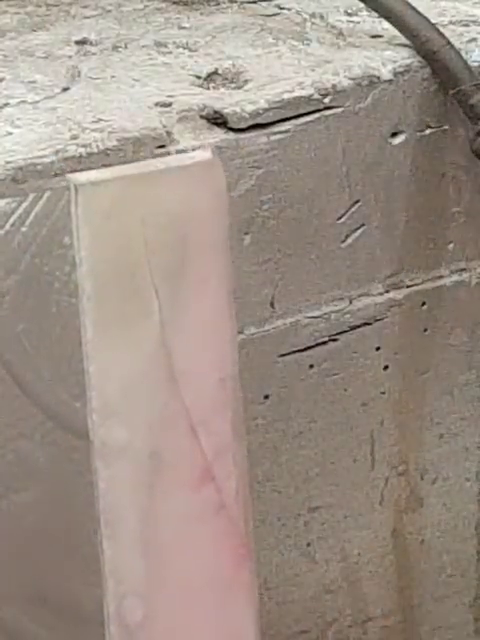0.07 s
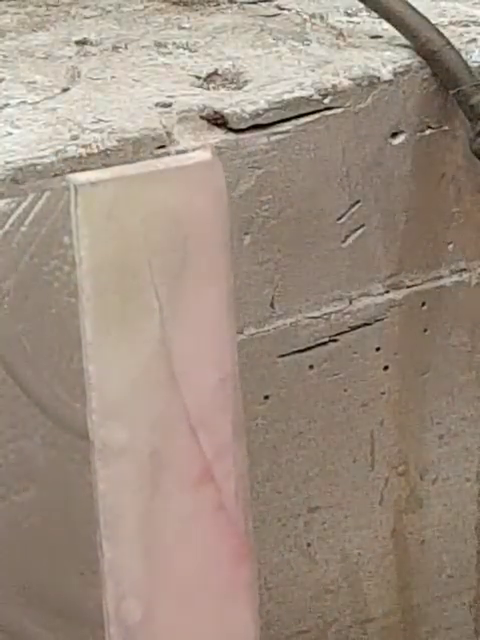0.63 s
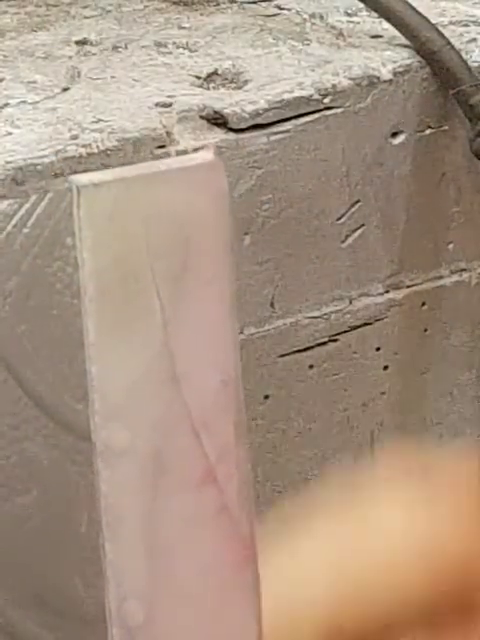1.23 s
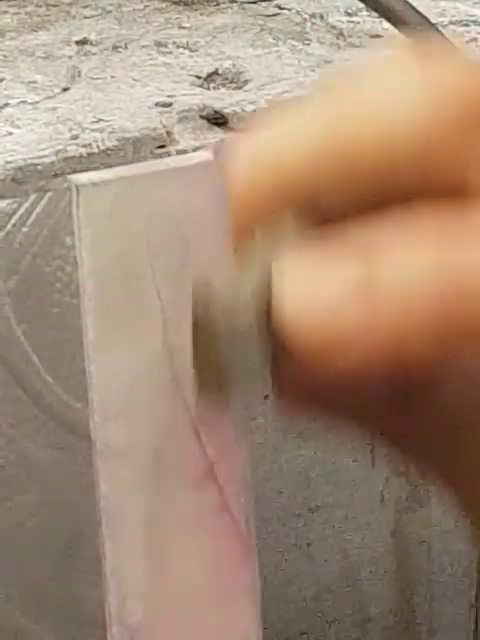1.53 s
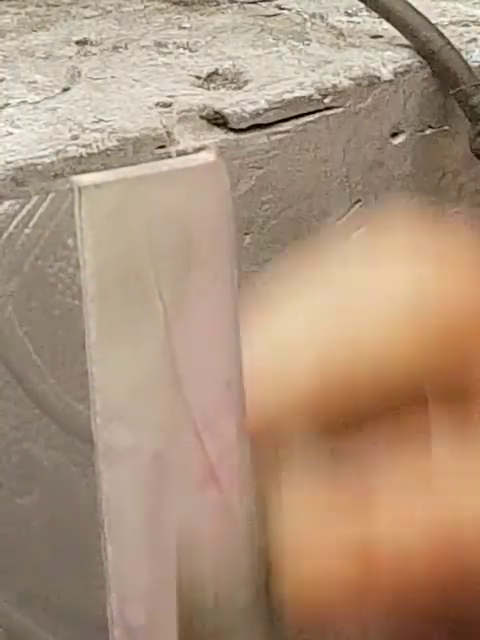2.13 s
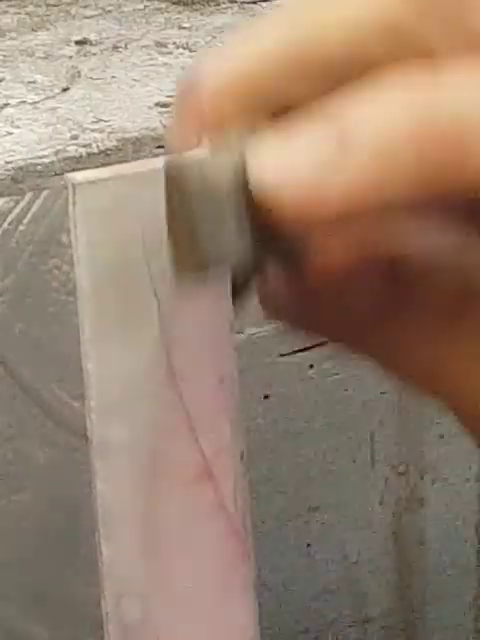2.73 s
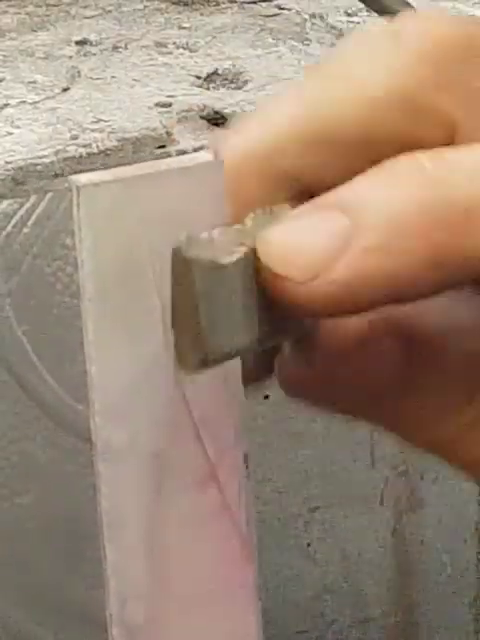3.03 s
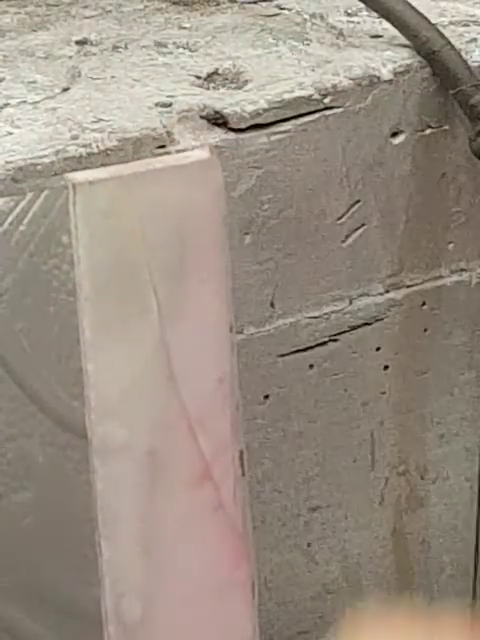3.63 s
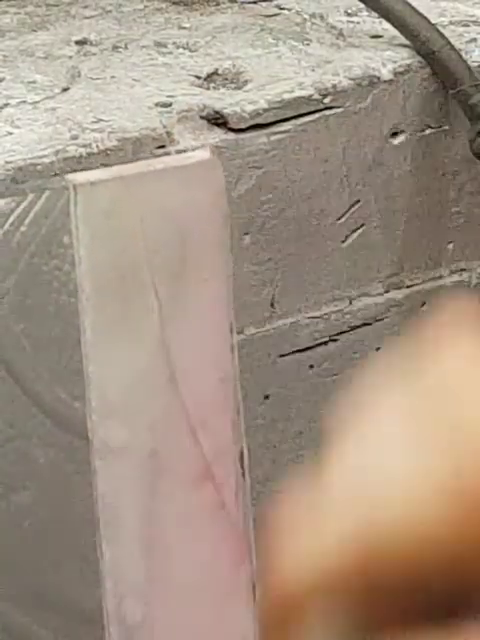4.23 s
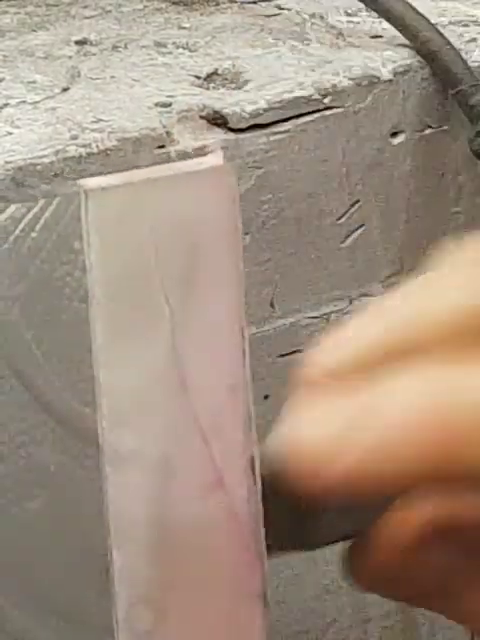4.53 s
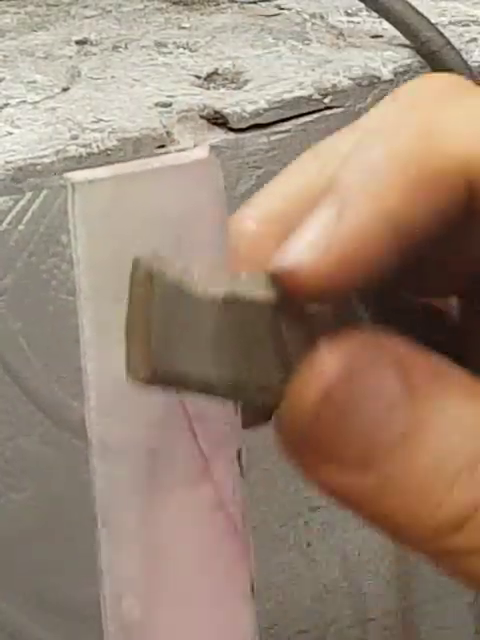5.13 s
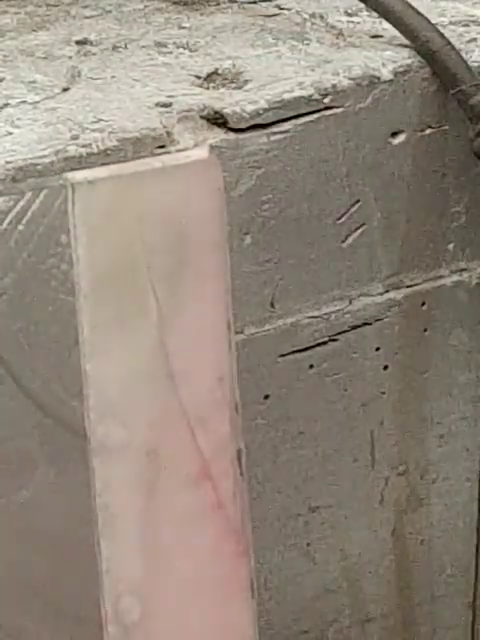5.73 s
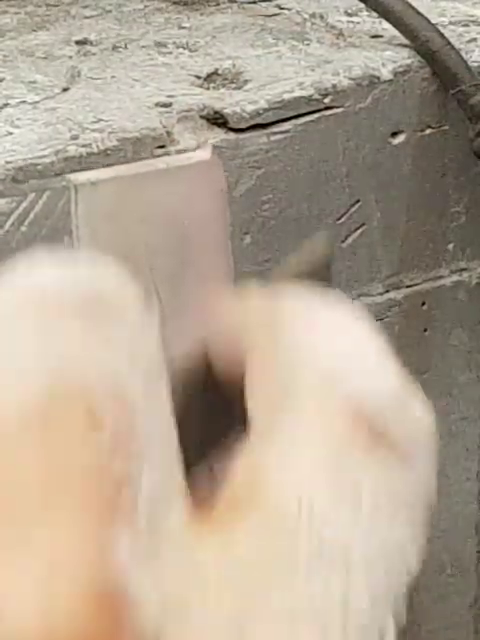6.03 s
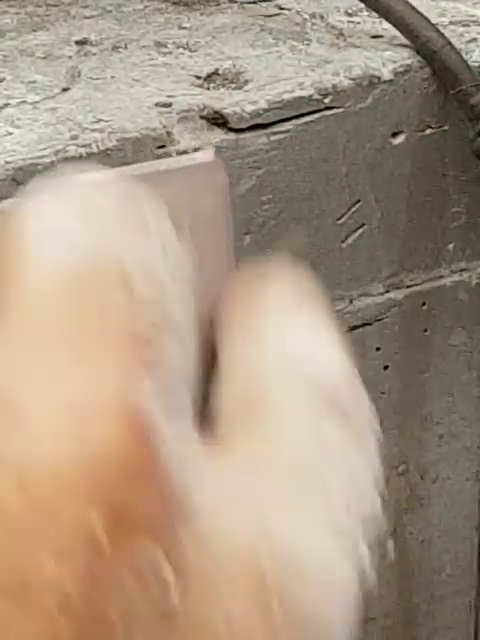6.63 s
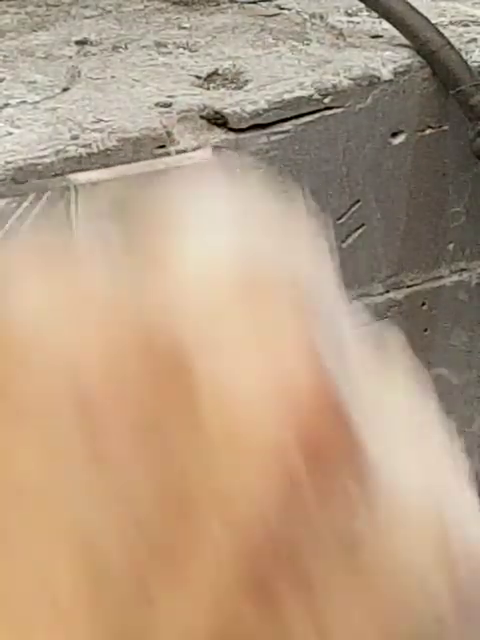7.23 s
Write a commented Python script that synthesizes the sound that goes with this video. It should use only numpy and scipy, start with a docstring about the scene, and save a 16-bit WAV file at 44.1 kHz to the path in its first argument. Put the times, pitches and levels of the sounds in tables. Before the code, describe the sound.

A small sharpening stone scrapes quickly back and forth along a glass edge, stops with a few sharp knocks, then resumes.

```python
"""A small sharpening stone rubbed back and forth along the edge of a glass pane, in a hard-walled workshop.
Its grit scratches the pane's modes into sound; the stone slips off, knocks back on, slides lightly,
and the strokes resume. A nearby stereo microphone picks up the pane, the near walls and the room's
short tail, over quiet background air."""
import sys
import numpy as np
from scipy import signal
from scipy.fft import rfft, irfft, next_fast_len
from scipy.io import wavfile
from scipy.ndimage import uniform_filter1d, map_coordinates

SR = 44100
rng = np.random.default_rng(int(sys.argv[2]) if len(sys.argv) > 2 else 0)


def pcm_store(signal):
    """Save signal as 16-bit PCM."""
    levels = np.round(np.clip(np.atleast_2d(signal), -1, 1) * 32767)
    wavfile.write(sys.argv[1], SR, levels.astype(np.int16).T)


N = 320599

FFT_SIZE = 8192
HZ = np.fft.rfftfreq(FFT_SIZE, 1 / SR)
# Broad response of stone on glass. Each row: frequency in Hz, gain in dB.
GLASS_RESPONSE = [(60, -37.5), (100, -26), (130, -28), (290, -27), (350, -15.5), (620, -17), (780, -8),
                  (1000, -2), (2000, -6), (2900, -0.5), (4200, -3.5), (5300, -12.5), (6200, -7.5),
                  (9000, -23), (11500, -18), (15500, -24)]


def amp(db):
    """Decibels to gain."""
    return 10 ** (np.asarray(db) / 20)


def unit(x):
    """Scaled to rms 1."""
    return x / np.sqrt(np.mean(x ** 2) + 1e-20)


def along(points, hz):
    """(Hz, value) points read on a log frequency axis."""
    point_hz, values = np.transpose(points)
    return np.interp(np.log(hz + 1), np.log(point_hz + 1), values)


def wobble(position):
    """A smooth random curve with one knot per unit of position."""
    return map_coordinates(rng.standard_normal(int(position[-1]) + 4), [position])


def filtered(x, response):
    """Filter x by a gain given as a function of Hz."""
    n = x.shape[-1]
    padded = next_fast_len(n + FFT_SIZE)
    return irfft(rfft(x, padded) * response(np.fft.rfftfreq(padded, 1 / SR)), padded)[..., :n]


def minimum_phase(db):
    """Impulse response of energy 1, shaped by a dB curve on the HZ grid."""
    cepstrum = irfft(np.log(amp(db)))
    cepstrum[1:FFT_SIZE // 2] *= 2
    cepstrum[FFT_SIZE // 2 + 1:] = 0
    impulse = irfft(np.exp(rfft(cepstrum)))
    return impulse / np.linalg.norm(impulse)


def add(track, start_s, x):
    """Mix x into the track from start_s."""
    i = round(start_s * SR)
    x = x[:, max(-i, 0):N - i]
    track[:, max(i, 0):][:, :x.shape[1]] += x


def diffuse(pair, alike=0.99, crossing_s=0.00044):
    """Sound from all sides: alike at both capsules in the bass, unrelated in the treble."""
    angle = lambda hz: np.arccos(np.clip(alike * np.sinc(2 * hz * crossing_s), -1, 1)) / 2
    mid, side = filtered(pair, lambda hz: np.array([np.cos(angle(hz)), np.sin(angle(hz))]))
    return np.array([mid + side, mid - side])


def workshop_air(level_db=-59.5, drift_db=1.0):
    """Room tone: the quiet, nearly steady air all around the microphone."""
    # Spectrum of the air. Each row: frequency in Hz, relative density in dB.
    spectrum = [(15, -51), (25, -17.5), (43, -20.5), (55, -9.5), (76, -9), (123, -12.5), (371, -18),
                (473, -17), (527, -18.5), (1040, -21), (1550, -23.5), (3050, -29.5), (4100, -36),
                (8970, -44.5), (15800, -38)]
    t = np.arange(N) / SR
    noise = diffuse(rng.standard_normal((2, N)), alike=0.62)
    air = filtered(noise, lambda hz: amp(along(spectrum, hz)))
    return unit(air) * amp(level_db + drift_db * wobble(6 * t))


def in_workshop(x, direct_db=-9.5, walls_db=-8, tail_db=-3, walls_t60=0.067, lag_s=.00034):
    """The direct sound reaches the left capsule a little late; near walls and the room's tail follow."""
    # Decay of the room. Each row: frequency in Hz, t60 in seconds.
    decay = [(150, 0.88), (500, 0.37), (2500, 0.25), (7000, 0.21), (15000, 0.14)]
    hz, frame_s, spectra = signal.stft(rng.standard_normal((2, SR // 2)), SR, nperseg=256)
    tail = signal.istft(spectra * amp(-60 * frame_s / along(decay, hz)[:, None]), SR, nperseg=256)[1]
    t = np.arange(tail.shape[1]) / SR
    walls = rng.standard_normal(tail.shape) * amp(-60 * t / walls_t60)
    echo = (amp(tail_db) * unit(tail) + amp(walls_db) * unit(walls)) / np.sqrt(len(t))
    wet = signal.fftconvolve(x[None], diffuse(echo), axes=1)[:, :len(x)]
    return wet + amp(direct_db) * np.array([np.roll(x, round(lag_s * SR)), x])


def ringing_modes(rise_s=0.0043):
    """Single lightly damped modes, left ringing by a bump or as the stone lifts, swell and die away."""
    # Each row: start in seconds, level in dB, frequency in Hz, t60 in seconds.
    rings = [(0.913, -47, 147, 0.72), (1.522, -45, 173, 0.37), (1.922, -38, 161, 0.37),
             (2.201, -39, 158.5, .35), (3.918, -40, 159.6, 0.4), (4.472, -46, 760, 0.99),
             (5.01, -39.5, 156, 0.31), (5.22, -40, 562, 0.64), (7.035, -43.5, 99.3, 0.88)]
    out, t = np.zeros((2, N)), np.arange(SR) / SR
    for start, db, hz, t60 in rings:
        envelope = amp(db - 60 * t / t60) * (1 - np.exp(-t / rise_s))
        add(out, start, (envelope * np.sin(2 * np.pi * hz * t))[None])
    return out


def pane(force, comb_db, bass_db, body_db, hiss_db):
    """The pane's answer to a force: its modes on a broad response, tilted by how the stone is held."""
    # Resonances. Each row: frequency in Hz, width in Hz, strength in dB against the broad response.
    resonances = [(182.5, 13, 10.5), (249.7, 29, 8.5), (370, 53, 12), (419, 6.1, 10), (530, 60, 7),
                  (577.4, 24.5, 13), (698, 45, 8), (846.7, 11, 6.5), (910, 6, 1.5), (962, 8.8, 1.5),
                  (1004, 35, -9), (1038, 16, 2.5), (1236, 170, -1.5), (1530, 15, 3), (1667, 99, 8),
                  (1840, 36, -6), (1857, 60, 6.5), (2235, 54, 2), (2375, 20, 6.5), (2507, 110, -0.5),
                  (2577, 22, -10.5), (2872, 100, 0.5), (3035, 16, -7.5), (3210, 90, 1), (3395, 86, -2),
                  (3450, 22, -11), (4130, 86, -2), (7380, 32, 6)]
    hz, width, db = np.transpose(resonances)[:, :, None]
    peaks = amp(db) ** 2 / (1 + (2 * (HZ - hz) / width) ** 2)
    modes = 10 * np.log10(1 + peaks.sum(axis=0))
    # higher up the modes crowd into an irregular comb
    comb = comb_db * along([(1000, .15), (3300, .25), (4800, 1)], HZ)
    tilt = along([(130, 0), (300, bass_db), (430, bass_db), (650, body_db), (1200, body_db),
                  (1800, 0), (4200, 0), (6000, hiss_db)], HZ)
    impulse = minimum_phase(along(GLASS_RESPONSE, HZ) + modes + comb + tilt)
    return signal.fftconvolve(np.pad(force, (0, SR // 3)), impulse)


def stone_knocks(comb_db, crack_t60=.012, contact_hz=10500):
    """The stone catches or lands on many grains at once: a sharp crack, then a quickly dying crunch."""
    # Each row: start in seconds, force in dB, crunch t60 in seconds, extra bass, body and hiss in dB.
    knocks = [(.719, -16, .12, -11, -11, -10.5), (3.045, -17, .1, -10, -10, -8.5),
              (4.4719, -6, 0.032, 0.5, -6, -3), (4.559, -16.5, 0.044, -4, -0.5, -4.5),
              (5.0054, -8, 0.041, 8.5, -2.5, -0.5), (5.015, -8.5, .08, 3, -0.5, -6.5),
              (6.058, -26.5, 0.07, 11, -4, -11.5), (6.204, -17, 0.11, 7.5, -2.5, -8.5)]
    out, t = np.zeros((2, N)), np.arange(SR // 10) / SR
    blunt_corner = signal.butter(2, contact_hz, fs=SR)  # softens the top
    for start, db, crunch_t60, *colour_db in knocks:
        crack = amp(-60 * t / crack_t60)
        crunch = .8 * amp(-60 * t / crunch_t60)
        force = amp(db) * np.maximum(crack, crunch) * rng.standard_normal(len(t))
        force[0] = 4 * amp(db)  # first contact
        force = signal.lfilter(*blunt_corner, force)
        add(out, start, in_workshop(pane(force, comb_db, *colour_db)))
    return out


def grit(t, rough_db=2.0, chips_per_s=70):
    """Countless grains scratch in clumps; now and then a larger one breaks off."""
    grains = rng.standard_normal(len(t))
    clumps = amp(rough_db * wobble(t * 500) + 0.55 * wobble(t * 55))
    chips = (rng.random(len(t)) < chips_per_s / SR) * rng.uniform(-9, 9, len(t))
    return unit(grains * clumps) + chips


def patches(shape, bins):
    """A random frequency-by-time field, smoothed over the given bins and six frames."""
    return unit(uniform_filter1d(uniform_filter1d(rng.standard_normal(shape), bins, 0), 6, 1))


def cross_nodes(force, start, outward, fine_db=1.5, broad_db=0.43):
    """The stone crosses nodes and antinodes of the bending waves, so the colour shifts within a stroke."""
    # The standing wave under the stone.
    # Each row: time in seconds, antinode in Hz at one turn and at the other, depth in dB.
    standing_wave = [(0, 2045, 3620, 4.5), (1.5, 2100, 3550, 2.5), (2.4, 2190, 3200, 1),
                     (5.302, 2470, 3170, 0.5), (6.2, 1940, 2296, 4), (7.27, 1880, 2280, 1)]
    times, *columns = np.transpose(standing_wave)
    near_hz, far_hz, depth_db = [np.interp(start, times, column) for column in columns]
    hz, t, spectra = signal.stft(force, SR, nperseg=1024)
    place = (1 - outward * np.cos(np.pi * t / t[-1])) / 2
    antinode_hz = near_hz + (far_hz - near_hz) * place
    # a bending wave's wavenumber grows with the root of frequency
    standing = np.cos(4 * np.pi * np.sqrt(hz[:, None] / antinode_hz))
    reach = along([(700, 0.17), (1900, 1), (3300, 0.14), (6000, 0.14)], hz)[:, None]
    fine = np.minimum(patches(spectra.shape, bins=2), 1.3)  # sharp dips, but only blunt peaks
    broad = patches(spectra.shape, bins=14)
    colour_db = depth_db * reach * standing + fine_db * fine + broad_db * broad
    # the modes share the rubbing's power, so the colour leaves the level alone
    power = np.average(amp(colour_db) ** 2, axis=0, weights=amp(along(GLASS_RESPONSE, hz)) ** 2)
    colour_db -= 10 * np.log10(power)
    return signal.istft(spectra * amp(colour_db), nperseg=1024)[1][:len(force)]


def stone_strokes(comb_db, level_db=-.5, turn_speed=0.046, light_db=-21.5):
    """The stone speeds up and slows to each turn; in most strokes the hand bears down, then eases off."""
    # Strokes, each lasting until the next turn or lift.
    # Each row: start in seconds, relative pressure at mid-stroke in dB, its fall over the stroke in dB.
    strokes = [(-0.11, -16.5, 21.5), (0.111, -17.5, 4), (0.364, -20.5, 5.0), (0.582, -21, 6.5),
               (0.824, -20, 5.5), (0.988, -17, 4.5), (1.26, -20, 6.0), (1.425, -17.0, 6.5),
               (1.647, -18, -4.5), (1.814, -17, 4.0), (2.008, -19.5, -11.5), (2.153, -19, 19),
               (2.342, -22.0, 10), (2.455, -21.5, 20.5), (2.61, -25, 2.5), (2.734, -23.5, 24),
               (2.866, -21, 4.5), (2.979, -22, 7.5), (3.118, -18.1, 2.0), (3.349, -18, 13.5),
               (3.584, -17, 11), (3.78, -17.5, 10), (4.034, -16.5, 0.5), (4.236, -14.5, -3.5),
               (5.071, -32, 27), (6.044, -33, 2.0), (6.186, -17.5, 19), (6.352, -18.0, 14),
               (6.498, -20.5, 26), (6.636, -21.5, 23.5), (6.762, -16.5, 15.0), (6.892, -18.5, 20.5),
               (7.029, -18.6, 20.5), (7.159, -19, 16)]
    # Times in seconds at which the stone stops rubbing.
    lifts = [4.455, 5.341, 6.175, 7.295]
    # The grip shifts along the edge. Each row: time in seconds, extra bass, body and hiss in dB.
    grip_tone = [(.22, -6.5, -1.5, 1), (.71, -5.5, -6, 1.5), (.92, -0.5, -6.5, -0.5), (1.12, -8, -2.5, .5),
                 (1.35, -2.5, -2.5, 1), (2.1, -1.5, 0.5, .5), (2.55, -2, -4.5, -1.5), (3.04, 0, -5.5, -1.5),
                 (3.25, -1, 0.5, 1.5), (3.9, -1, -3.5, 0.5), (4.15, 0, -3, 2.5), (4.35, -0.5, 0, -0.5),
                 (6.27, -0.5, -2, -5), (6.6, -2, -2.5, -1.5), (7.252, -4.5, -4, -1.7)]
    out = np.zeros((2, N))
    stops = np.append([row[0] for row in strokes], lifts)
    grip_s, *grip_db = np.transpose(grip_tone)
    for k, (start, press_db, ease_db) in enumerate(strokes):
        end = stops[stops > start].min()
        t = np.arange(round((end - start) * SR)) / SR
        progress = t / t[-1]
        speed = turn_speed + (1 - turn_speed) * np.sin(np.pi * progress)
        pressure = amp(level_db + press_db - ease_db * (progress - .5))
        force = pressure * speed * cross_nodes(grit(t), start, outward=(-1) ** k)
        bass_db, body_db, hiss_db = [np.interp((start + end) / 2, grip_s, band) for band in grip_db]
        # below light_db the stone skates instead of biting, and the tone gains bass and body
        skate_db = max(light_db - press_db, 0)
        scrape = pane(force, comb_db, bass_db + 0.75 * skate_db, body_db + 0.45 * skate_db, hiss_db)
        add(out, start, in_workshop(scrape))
    return out


def scene():
    """Strokes and knocks share one pane, brighter at the left capsule, over the workshop's air."""
    # Stereo balance of the pane. Each row: frequency in Hz, left minus right in dB.
    balance = [(400, 1.7), (900, -0.5), (1600, 1.5), (2500, 5.5), (4200, 3), (6000, 3), (8500, 12),
               (11000, 5), (15000, 5.5)]
    comb_db = 0.6 * wobble(HZ / 120)
    glass = stone_strokes(comb_db) + stone_knocks(comb_db)
    glass = filtered(glass, lambda hz: amp(np.array([[.5], [-.5]]) * along(balance, hz)))
    return glass + ringing_modes() + workshop_air()


def record(dry):
    """The recorder keeps nothing above its band limit."""
    return filtered(dry, lambda hz: hz < 15750)


dry = scene()
out = record(dry)
pcm_store(out)
```